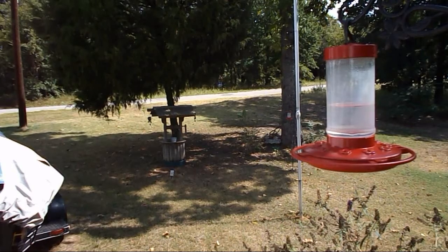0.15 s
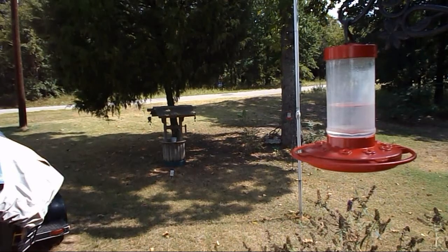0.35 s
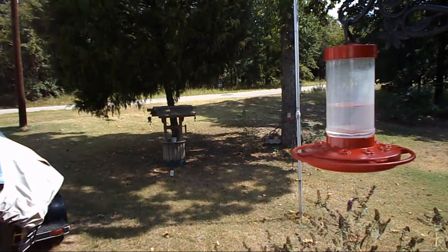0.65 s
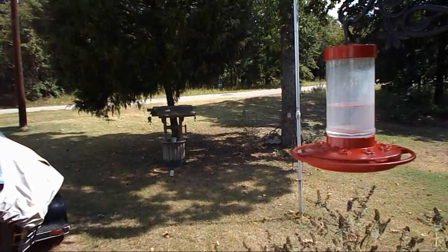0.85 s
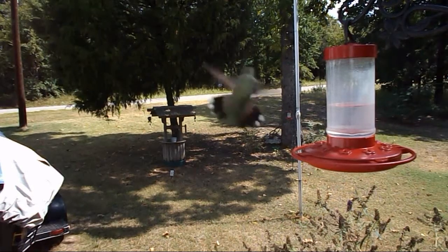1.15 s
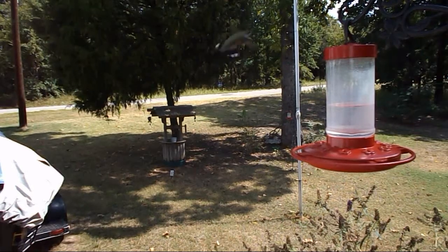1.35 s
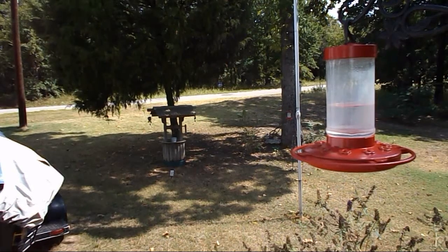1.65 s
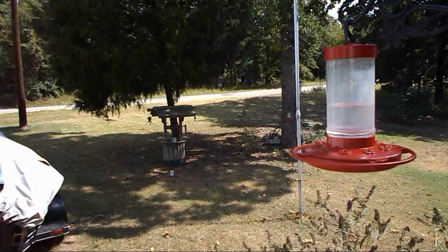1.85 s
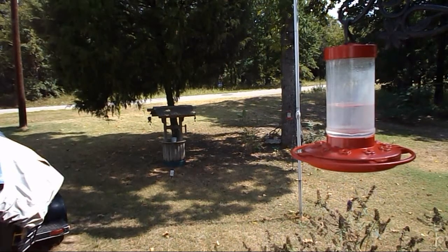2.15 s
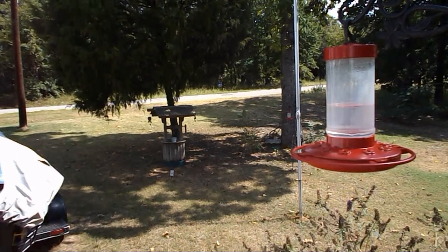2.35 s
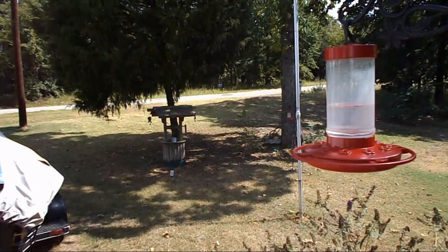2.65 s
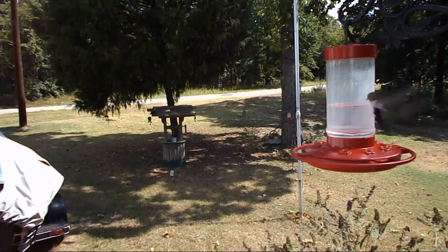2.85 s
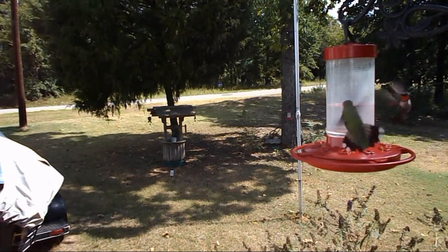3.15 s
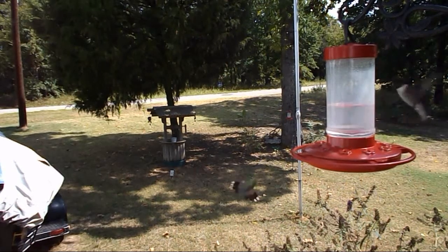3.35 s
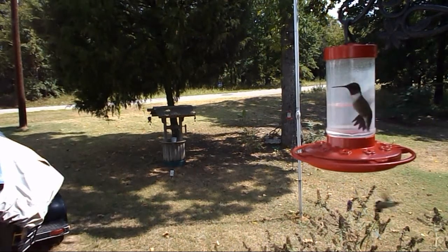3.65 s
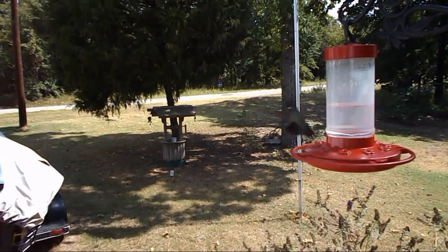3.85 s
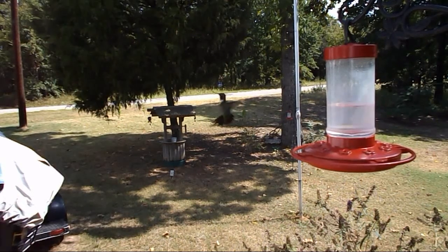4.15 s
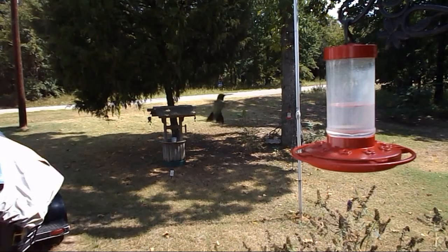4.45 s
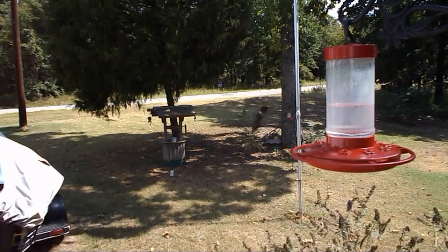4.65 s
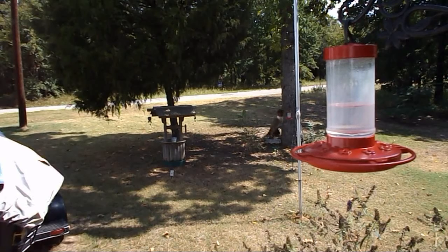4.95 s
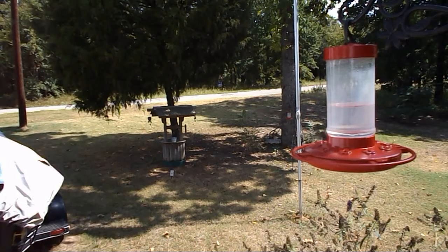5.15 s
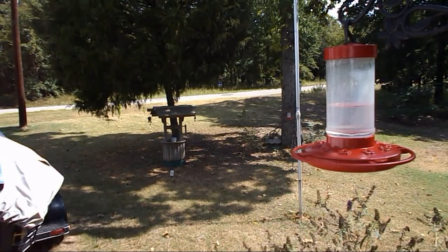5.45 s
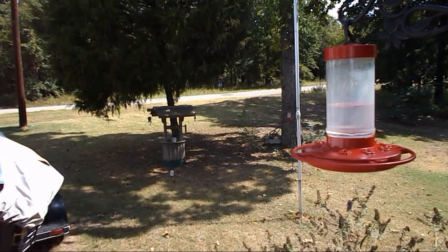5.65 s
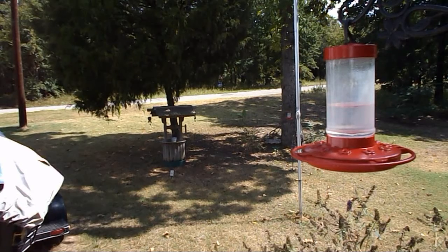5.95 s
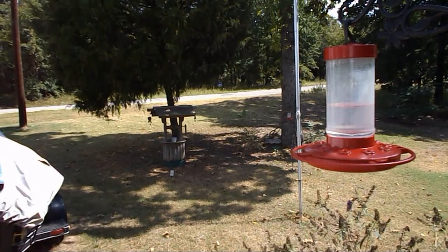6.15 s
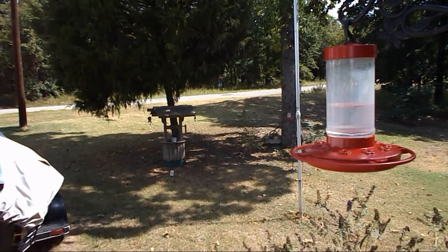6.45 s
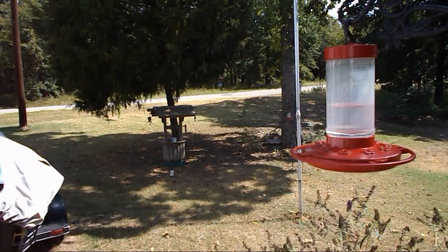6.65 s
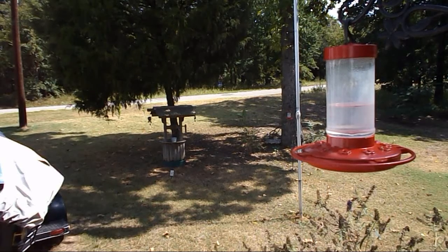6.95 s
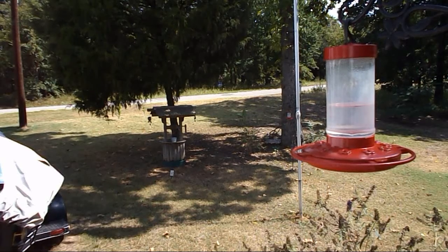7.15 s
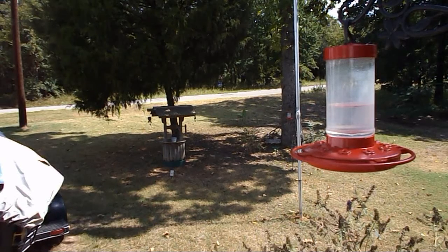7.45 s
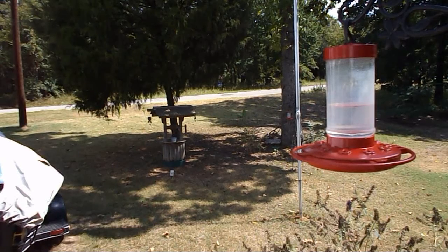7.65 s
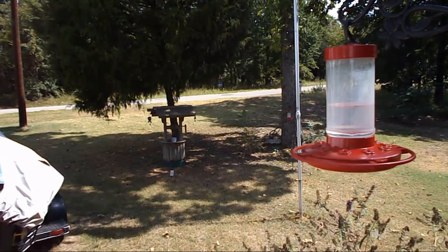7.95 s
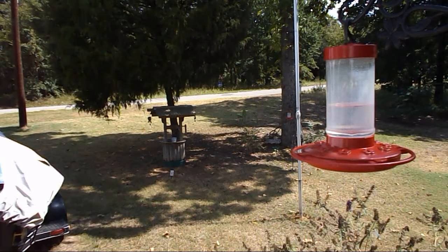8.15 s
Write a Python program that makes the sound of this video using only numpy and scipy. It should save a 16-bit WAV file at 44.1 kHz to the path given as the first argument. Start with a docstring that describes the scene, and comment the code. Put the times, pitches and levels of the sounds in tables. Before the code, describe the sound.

A close outdoor microphone in a quiet, airy yard catches tiny birds chasing. Piercing squeals and rippling trills crowd the first two seconds, ending in evenly spaced sharp chips. Then the voices mostly stop and buzzing wingbeats whirr past several times, with rough little clicks of scolding. Leaves stir; faint hummingbird calls return from farther off beside a thin songbird, and a small wind thump lands near the end.

```python
"""Hummingbirds chase each other round a backyard feeder: held whistles, warbling buzzes, falling chips, harsh
scolds and scooped trills, each a set of harmonics weighted by a throat resonance. Wings hum by the beat, and
their feathers hiss and tick. Trees and nearby surfaces answer with short echoes of decaying noise. A far
songbird pipes in plain sines; air and leaves are coloured noise, and one puff of wind strikes the microphone."""
import sys
import numpy as np
from scipy import signal
from scipy.fft import rfft, irfft, next_fast_len
from scipy.io import wavfile
from scipy.ndimage import uniform_filter1d, map_coordinates

SR = 44100
rng = np.random.default_rng(int(sys.argv[2]) if len(sys.argv) > 2 else 0)


def makeup_ratio(level_db):
    """Linear amplitude ratio for a level in decibels (20 dB per factor of ten)."""
    decades = np.asarray(level_db, float) / 20
    return 10 ** decades


def int16_out(signal):
    """Quantize to a 16-bit WAV file."""
    q = np.round(np.clip(np.atleast_2d(signal).T, -1, 1) * 32767)
    wavfile.write(sys.argv[1], SR, q.astype(np.int16))


N = 365985

# Note levels are at the source, ahead of overtones, throat and treble loss.
# held whistles: start_s, length_s (before any plunge), start_hz, held_hz, level_db
WHISTLES = [(.589, 0.04394, 6600, 6170, -36.5), (0.9606, .026, 6510, 6300, -37.5),
            (.989, 0.048, 6120, 6590, -24), (1.385, .0532, 6955, 6693, -11),
            (6.000, 0.063, 6320, 6595, -34.5)]
# buzzes, pitch ahead of the warble: start_s, length_s, start_hz, end_hz, level_db
BUZZES = [(0.8455, 0.037, 3550, 2290, -43.5), (1.2516, .031, 3300, 2102, -12),
          (1.943, 0.040, 4470, 2045, -17), (6.3144, 0.029, 3845, 2146, -34.5)]
# falling chips: start_s, length_s, start_hz, end_hz, level_db
CHIPS = [(0.9346, .013, 2850, 2243, -39.5), (0.991, 0.016, 2850, 2036, -43), (1.87, .010, 4000, 1370, -32),
         (2.0232, 0.029, 3530, 1440, -15.5), (2.0854, 0.024, 3060, 1474, -15),
         (2.1512, 0.024, 2970, 1450, -16), (2.219, 0.025, 3060, 1485, -17.5),
         (2.295, 0.024, 2920, 1500, -18.5), (2.3801, 0.024, 3010, 1444, -19),
         (2.5642, .023, 2434, 1556, -31.5), (3.907, 0.026, 2570, 1540, -33),
         (6.417, 0.028, 3045, 1643, -38), (6.52, 0.021, 2930, 1904, -41)]
# short harsh scolds: start_s, length_s, start_hz, level_db
SCOLDS = [(1.098, 0.0034, 1920, -33), (1.175, 0.006, 2060, -28.5), (1.59, 0.0043, 1515, -24.5),
          (1.598, 0.0031, 1390, -26), (1.603, 0.0065, 1386, -33), (1.612, 0.0029, 1550, -31.5),
          (1.618, 0.0047, 1510, -37), (1.626, 0.003, 1510, -37), (2.659, 0.0043, 1500, -44),
          (2.664, 0.0035, 1480, -36), (2.939, 0.0045, 1680, -47), (2.958, 0.0019, 1650, -38),
          (3.484, 0.0025, 1630, -27.5), (3.4881, 0.0087, 1500, -28.5), (3.54, .005, 1650, -39),
          (3.545, 0.0041, 1604, -31), (3.55, 0.0016, 1600, -30)]
# trill syllables, upward scoops: start_s, length_s, foot_hz, level_db
TRILLS = [(1.1035, .0097, 4300, -36), (1.1125, .011, 2250, -28), (1.124, 0.014, 2560, -21.5),
          (1.138, 0.0097, 2622, -19), (1.15, .0095, 2400, -19), (1.164, .0093, 2177, -22),
          (1.787, 0.0057, 5770, -19.5), (1.797, .0082, 5640, -13.5), (1.808, 0.012, 6060, -12),
          (1.821, .0094, 5700, -8.5), (1.8354, 0.0072, 4540, -9.5), (1.847, .008, 3040, -11.5),
          (1.857, .012, 2320, -20), (6.163, .012, 3020, -38), (6.173, .014, 2557, -39),
          (6.186, .014, 2650, -32), (6.203, .011, 2515, -33), (6.218, .0092, 2507, -39)]
# harmonics at the source, first upward: level_db
OVERTONE_DB = [2, -0.5, -2, -4, -10, -6.5, -12]
# throat resonance: freq_hz, gain_db
THROAT = [(1200, -27), (2000, -16.5), (3000, -14.5), (4500, -8.5), (5600, 0), (6600, 3), (7300, 2),
          (8500, -3), (10500, -11.5)]
# calling bird: time_s, distance_m, treble_loss_db_per_octave (as it turns away)
PLACE = [(.6, 18, 10), (.9, 13.5, 4.5), (1.0, 4.9, 0.5), (1.15, 2, 4), (1.25, 0.88, -0.1),
         (1.4, 0.54, -3.5), (1.6, 4, 0.5), (1.8, 1.2, -3), (2.4, 1.2, .6), (2.6, 3.4, 5.5), (3.9, 2.1, 3.5),
         (6.0, 18, -0.5), (6.2, 9, 3), (6.4, 8.7, 2), (6.6, 18, 7.5)]
# echo off trees: freq_hz, t60_s
TREES = [(1500, .35), (6000, 0.38), (11000, 0.51)]
# echo off ground, feeder and wall: freq_hz, t60_s
NEARBY = [(1500, 0.087), (6000, 0.09), (11000, .05)]
# birds sweep past: nearest_s, width_s (between -6 dB points), beats_per_s, loudest_hum_hz, hum_db
PASSES = [(0.462, 0.13, 64, 200, -71), (1.189, 0.084, 40.7, 177.7, -42), (1.311, 0.084, 44.5, 150, -39.5),
          (1.439, .24, 48, 230, -46), (1.901, .3, 49.4, 100, -53.5), (2.96, 0.14, 56, 212, -51),
          (3.14, 0.11, 54, 112, -49.5), (3.327, 0.4, 53, 155, -48.5), (3.52, 0.15, 52, 112, -44.5),
          (3.679, 0.16, 51, 200, -48.5), (4.101, 0.39, 49, 188.3, -51), (4.379, .2, 55.5, 210, -54),
          (4.74, 0.22, 48, 200, -57.5), (4.951, .14, 47, 200, -57), (5.299, 0.24, 52.6, 200, -54.5),
          (5.45, 0.071, 50, 199, -54), (5.95, 0.21, 52, 200, -59)]
# feather hiss, relative spectrum: freq_hz, density_db
HISS = [(2000, -38.5), (3000, -14.5), (5500, -3), (7200, 2.5), (10500, -5), (11500, -19)]
# feathers that tick: centre_hz, half_width_hz, relative_db
QUILLS = [(3300, 820, -2.5), (4443, 850, -1), (5700, 1200, 6), (6880, 1200, -3)]
# far songbird: start_s, length_s, start_hz, level_db
SONGBIRD = [(6.04, .12, 3330, -57.5), (6.40, .06, 2600, -58), (6.56, .08, 3300, -57),
            (6.63, .15, 4030, -61), (6.91, .08, 2520, -59), (7.02, .06, 2870, -57.5),
            (7.085, .07, 3280, -57), (7.155, .055, 3960, -52)]
# steady air, relative spectrum: freq_hz, density_db
AIR = [(24, -39), (40, -7.5), (114, -2.5), (162, -5.5), (200, -0.5), (283, -4), (326, -5.5), (462, -5.5),
       (507, -5.5), (828, -8.5), (1170, -8.5), (2360, -15), (3430, -15.5), (5600, -18.5), (10500, -34.5),
       (10750, -36), (10900, -70.5)]
# leaves, relative spectrum: freq_hz, density_db
LEAVES = [(1000, -33.5), (1600, -11), (3000, -3), (4500, -4.5), (6500, -10), (9000, -23), (11000, -27)]
# leaves stir: strongest_s, width_s (between -6 dB points), level_db
STIRS = [(1.5, 1.1, -64), (3.55, 0.7, -57), (4.527, .2, -51.5), (5.141, .3, -50), (5.36, 0.27, -53),
         (6.2, 1.2, -57.5), (7.145, 0.28, -52)]
# wind puff, relative spectrum: freq_hz, density_db
GUST = [(30, -26.5), (50, 1.5), (100, -6), (300, -10), (800, -18.5), (1500, -24)]
# microphone port dip: centre_hz, width_hz, depth (0-1)
PORT_DIP = (7640, 283, 0.76)


def unit(x):
    """Scaled to rms 1."""
    return x / np.sqrt(np.mean(x ** 2) + 1e-20)


def along(points, hz):
    """Interpolates (Hz, value) points on a log frequency axis."""
    f, v = np.transpose(points)
    return np.interp(np.log(hz + 1), np.log(f + 1), v)


def curves(rows):
    """One value per sample for each column after the time."""
    s, *cols = np.transpose(rows)
    return [np.interp(np.arange(N) / SR, s, c) for c in cols]


def wobble(knots_per_s):
    """Smooth random curve."""
    knots = rng.standard_normal(int(N * knots_per_s / SR) + 4)
    return map_coordinates(knots, [np.arange(N) * knots_per_s / SR])


def filtered(x, response):
    """x through a zero-phase response of frequency."""
    m = next_fast_len(N + 8192)
    return irfft(rfft(x, m) * response(np.fft.rfftfreq(m, 1 / SR)), m)[:N]


def noise(spectrum):
    """Coloured noise of rms 1."""
    points = spectrum + [(SR / 2, -120)]
    return unit(filtered(rng.standard_normal(N), lambda hz: makeup_ratio(along(points, hz))))


def bells(s, width_s, db, floor_db):
    """Level in dB of events that swell and fade about their moments, powers summed over a floor."""
    grid = np.arange(0, N, 256)
    away = (grid[:, None] / SR - s) / width_s
    power = makeup_ratio(2 * floor_db) + makeup_ratio(2 * (db - 24 * away ** 2)).sum(axis=1)
    return np.interp(np.arange(N), grid, 10 * np.log10(power))


def air():
    """Steady coloured noise, its level wavering slightly."""
    return makeup_ratio(-48.5 + .55 * wobble(4)) * noise(AIR)


def leaves():
    """Coloured noise that stirs with the breeze over a still floor."""
    level_db = bells(*np.transpose(STIRS), floor_db=-68) + 1.9 * wobble(7.8)
    return makeup_ratio(level_db) * noise(LEAVES)


def wind_puff():
    """Rumble of one puff on the microphone, which the shove makes swing a few times."""
    peak_s, rise_s, fall_s = 7.5, .015, .033
    gust_db, thud_db, thud_hz = -35, -37, 78
    t = np.arange(N) / SR - peak_s
    puff = np.exp(-np.where(t < 0, -t / rise_s, t / fall_s))
    gust = makeup_ratio(gust_db) * noise(GUST)
    thud = makeup_ratio(thud_db) * np.cos(2 * np.pi * thud_hz * t)
    return puff * (gust + thud)


def wing_hum(beats, rate, loudest_hz):
    """Each stroke pushes the air: ten orders of the beat, wavering as the bird turns."""
    hum = np.zeros(N)
    for k in range(1, 11):
        order_db = -8 * np.log2(k * rate / loudest_hz) ** 2 + 3 * (k % 2 == 0) + 2.5 * wobble(8)
        hum += makeup_ratio(order_db) * np.sin(2 * np.pi * k * beats)
    return unit(hum * makeup_ratio(1.6 * wobble(30)))


def feathers(beats):
    """Feathers hiss, and narrow bands of noise tick once a beat."""
    ticks = np.zeros(N)
    for hz, half, db in QUILLS:
        band = [(hz - half, -30), (hz - half / 2, -3), (hz + half / 2, -3), (hz + half, -30)]
        ticks += makeup_ratio(db + 3.2 * wobble(14)) * noise(band)
    gate = np.exp(3 * np.cos(2 * np.pi * beats))
    return .78 * unit(gate * ticks) + .6 * noise(HISS)


def wings():
    """Hum and feather noise swell at each pass; the feathers swell less and linger longer."""
    far_db, feather_db, feather_follows, feather_lingers = -72, -24, .64, 2.7
    s, width_s, _, _, db = np.transpose(PASSES)
    _, rate, loudest_hz, _ = curves(PASSES)
    hum_level_db = bells(s, width_s, db, far_db)
    feather_level_db = feather_db + feather_follows * bells(s, feather_lingers * width_s, db, far_db)
    beats = np.cumsum(rate * (1 + .03 * wobble(8))) / SR
    return makeup_ratio(hum_level_db) * wing_hum(beats, rate, loudest_hz) + makeup_ratio(feather_level_db) * feathers(beats)


def swell(length_s, rise, fall):
    """Time, share of the note gone by, and an envelope with soft ends."""
    t = np.arange(round(length_s * SR)) / SR
    ends = np.clip(t / rise, 0, 1) * np.clip((length_s - t) / fall, 0, 1)
    return t, t / length_s, np.sin(np.pi / 2 * ends)


def glide(u, start_hz, end_hz, late):
    """Pitch fall, the share late (0-1) of it saved up for the close."""
    late = np.clip(late, 0, 1)
    return start_hz + (end_hz - start_hz) * ((1 - late) * u + late * u ** 3.8)


def shaky(t, depth):
    """Fast unsteadiness of the membranes: a factor around 1, depth its rms."""
    return 1 + depth * unit(uniform_filter1d(rng.standard_normal(len(t)), size=24))


def whistle(s, length_s, start_hz, held_hz, db):
    """Pitch and size of a note settling to a held pitch; long ones end in a plunge."""
    settle_share, waver_db_per_m = .21, .26
    plunge_s, plunge_hz, plunge_fade_db, plunge_after_s = .0063, 2000, 16.5, .045
    extra_s = plunge_s * (length_s > plunge_after_s)
    t, u, size = swell(length_s + extra_s, rise=.007, fall=.003)
    down = np.clip((t - length_s) / plunge_s, 0, 1)
    held = held_hz + (start_hz - held_hz) * np.exp(-u / settle_share)
    pitch = held + (plunge_hz - held) * np.sin(np.pi / 2 * down) ** 2.2
    distance_m = np.interp(s, *np.transpose(PLACE)[:2])
    waver = map_coordinates(rng.standard_normal(12), [t * 110 + 1]) * distance_m
    return pitch, size * makeup_ratio(-waver_db_per_m * waver - plunge_fade_db * down ** 6.8)


def buzz(s, length_s, start_hz, end_hz, db):
    """Pitch and size of a falling note with a fast warble that slows."""
    warble_hz = 221.3  # at the start
    t, u, size = swell(length_s, rise=.004, fall=.003)
    turn = 2 * np.pi * warble_hz * t * (1 - 3.7 * t) - .6
    # sharp crests, round troughs
    warble = np.exp((.245 - .041 * u) * np.sin(turn) - .035 * np.cos(2 * turn))
    return glide(u, start_hz, end_hz, late=.15) * warble * shaky(t, .025), size


def chip(s, length_s, start_hz, end_hz, db):
    """Pitch and size of a fall: forceful chips hold up, high starts slide at once, weak ones shake."""
    weak_db, late_per_db, late_per_octave, usual_hz = -32, .036, 1.25, 2950
    late = late_per_db * (db - weak_db) - late_per_octave * np.log2(start_hz / usual_hz)
    t, u, size = swell(length_s, rise=.0056, fall=.0077)
    shake = .0073 + .008 * (db < weak_db + 2)
    return glide(u, start_hz, end_hz, late) * shaky(t, shake), size


def scold(s, length_s, start_hz, db):
    """Pitch and size of a very short, rough note that sags a tenth."""
    t, u, size = swell(length_s, rise=.0006, fall=.00049)
    return start_hz * (1 - .1 * u) * shaky(t, .12), size


def trill(s, length_s, foot_hz, db):
    """Pitch and size of a scoop: down to its foot, up to a top, then a sag."""
    top_hz = 5730 + .165 * foot_hz
    depth = np.log2(top_hz / foot_hz)  # octaves
    # scoops deeper than an octave climb for longer
    rise_s = length_s * (.38 + 1.5 * max(depth - 1, 0))
    t, u, size = swell(length_s, rise=.0012, fall=.004)
    low_s = .16 * depth * rise_s  # deep scoops linger low first
    dip_hz = 350 * np.clip(1 - t / low_s, 0, 1) ** 2 * depth
    up = np.clip((t - low_s) / (rise_s - low_s), 0, 1) ** (1 + .25 * depth)
    droop_hz = 700 * (np.clip(t - rise_s, 0, 1) / .005) ** 2
    pitch = foot_hz + dip_hz + (top_hz - foot_hz) * (1 - (1 - up) ** 2) - droop_hz
    return pitch * shaky(t, .021 * depth), size * makeup_ratio(-8 * u / (1 + depth ** 4))  # shallow scoops fade


def add(out, s, pitch_hz, size):
    """Adds one note: harmonics of its pitch, each weighted by the throat as it glides."""
    turn = 2 * np.pi * np.cumsum(pitch_hz) / SR
    loss = np.interp(s, *np.transpose(PLACE)[[0, -1]])
    for k, db in enumerate(OVERTONE_DB, 1):
        hz = k * pitch_hz
        level = makeup_ratio(db + along(THROAT, hz) - loss * np.log2(hz / 6000)) * (hz < SR / 2)
        out[round(s * SR):][:len(turn)] += size * level * np.sin(k * turn)


def voices():
    """All the hummingbirds' notes, dry; they thin away below 1400 Hz."""
    out = np.zeros(N)
    kinds = [(whistle, WHISTLES), (buzz, BUZZES), (chip, CHIPS), (scold, SCOLDS), (trill, TRILLS)]
    for note, rows in kinds:
        for row in rows:
            pitch, size = note(*row)
            add(out, row[0], pitch, makeup_ratio(row[-1]) * size)
    return filtered(out, lambda hz: np.clip(hz / 1400, 0, 1) ** 6)


def echo(x, t60, delay_s):
    """Diffuse echo: noise tails, each frequency dying at its own speed, redrawn every 1/8 s."""
    out, step, lag = np.zeros(N + SR), SR // 8, round(delay_s * SR)
    for i in range(0, N, step):
        piece = x[i:i + step]
        if piece.any():
            hz, t, z = signal.stft(rng.standard_normal(SR // 2), SR, nperseg=64)
            decay = makeup_ratio(-60 * t / along(t60, hz)[:, None])
            tail = signal.istft(z * decay, SR, nperseg=64)[1]
            wet = signal.fftconvolve(piece, tail / np.linalg.norm(tail))
            out[i + lag:][:len(wet)] += wet
    return out[:N]


def echoes(birds):
    """Nearby surfaces and trees answer, more strongly the farther the bird."""
    nearby_m, trees_m = 13.8, 23.6  # where each echo about equals the direct sound
    metres, _ = curves(PLACE)
    nearby = echo(birds * (metres / nearby_m) ** .8, NEARBY, delay_s=.002)
    return nearby + echo(birds * metres / trees_m, TREES, delay_s=.0066)


def songbird():
    """Soft sines from far off, each rising 2 %, their level fluttering."""
    out, flutter = np.zeros(N), makeup_ratio(2 * wobble(40))
    for s, length_s, hz, db in SONGBIRD:
        t, u, size = swell(length_s, rise=.014, fall=.019)
        out[round(s * SR):][:len(t)] += makeup_ratio(db) * size * np.sin(2 * np.pi * hz * t * (1 + .01 * u))
    return out * flutter


def scene():
    """Yard, wings, birds and their echoes, one channel."""
    yard = air() + leaves() + wind_puff()
    birds = voices()
    return (yard + wings() + birds + echoes(birds) + songbird())[None]


def low_pass(x):
    """Removes everything above the highest recorded frequency."""
    return signal.sosfilt(signal.butter(12, 11640, fs=SR, output="sos"), x)


def record(dry):
    """Microphone: a narrow dip from its port, bass and treble limits."""
    bass_hz, top_hz = 44, 10180
    centre_hz, width_hz, depth = PORT_DIP

    def response(hz):
        dip = 1 - depth * np.exp(-((hz - centre_hz) / width_hz) ** 2)
        over_hz = hz - top_hz
        treble_db = -45 * np.clip(over_hz / 1150, 0, 1) ** 2 - 9 * np.clip(over_hz / 3000, 0, 4)
        bass = 1 / np.sqrt(1 + (bass_hz / (hz + 1)) ** 6)
        return dip * makeup_ratio(treble_db) * bass

    mix = filtered(dry[0], response)[None]
    return low_pass(mix)


dry = scene()
out = record(dry)
int16_out(out)
```